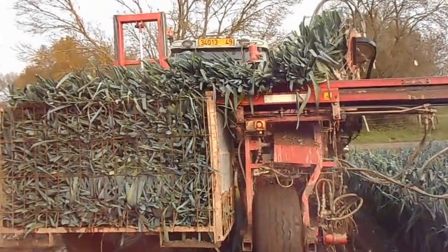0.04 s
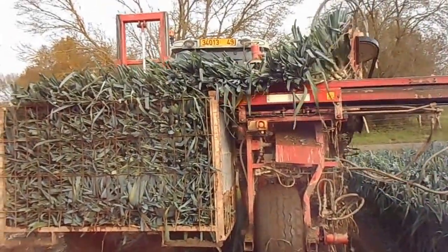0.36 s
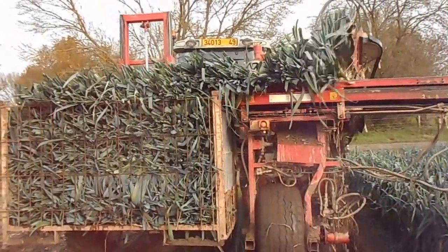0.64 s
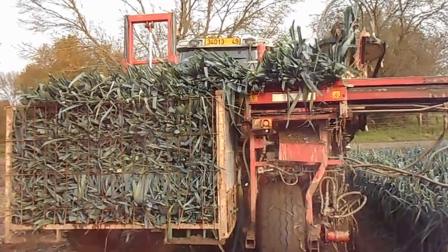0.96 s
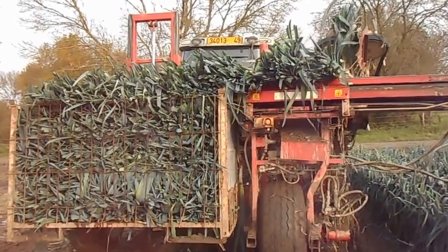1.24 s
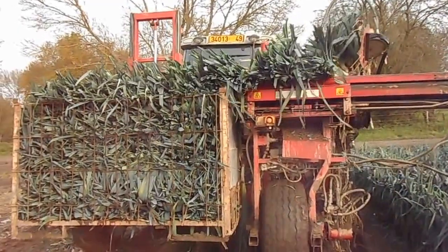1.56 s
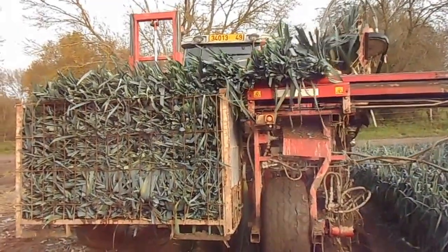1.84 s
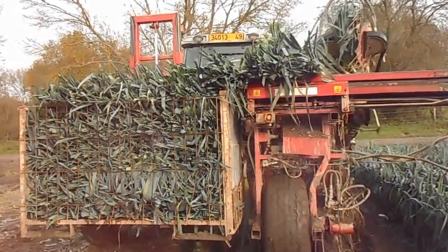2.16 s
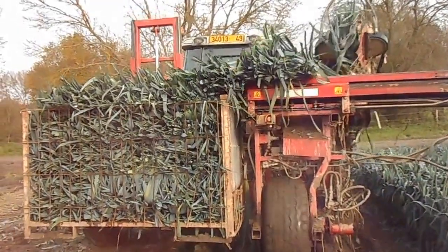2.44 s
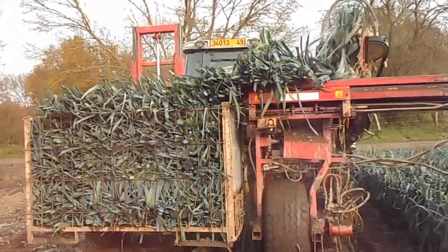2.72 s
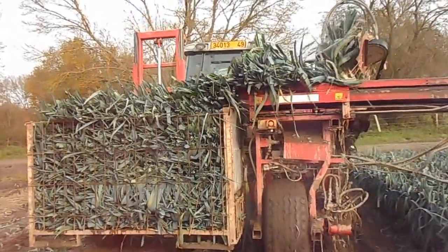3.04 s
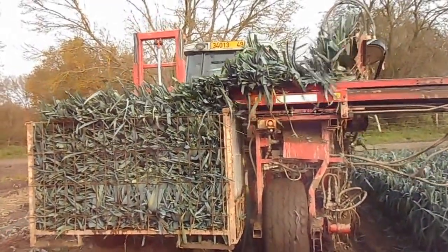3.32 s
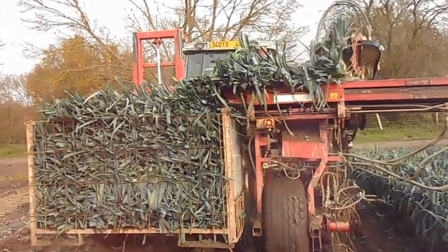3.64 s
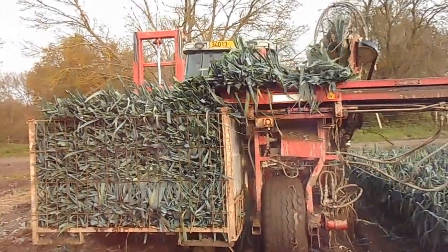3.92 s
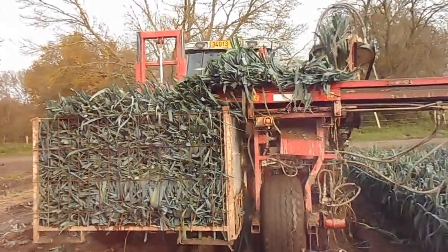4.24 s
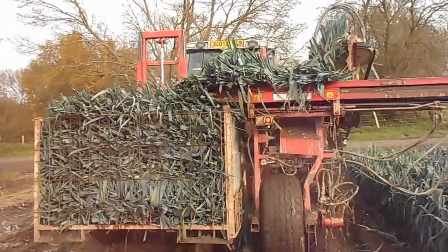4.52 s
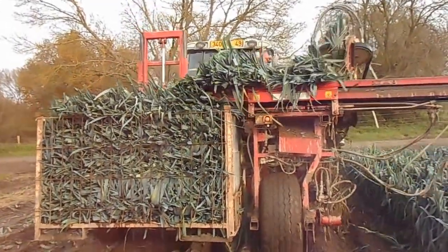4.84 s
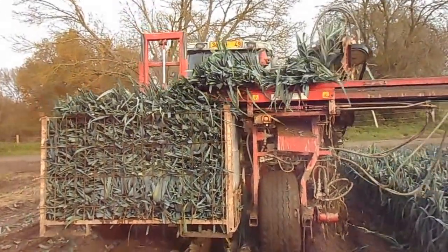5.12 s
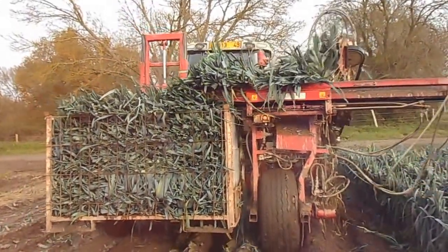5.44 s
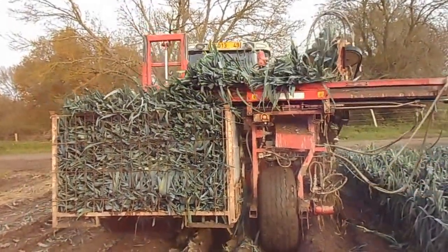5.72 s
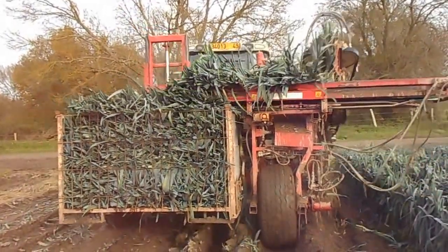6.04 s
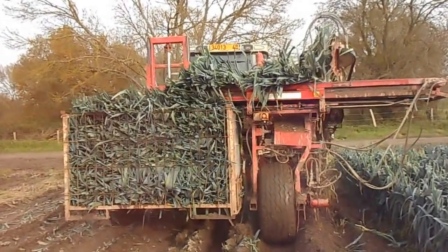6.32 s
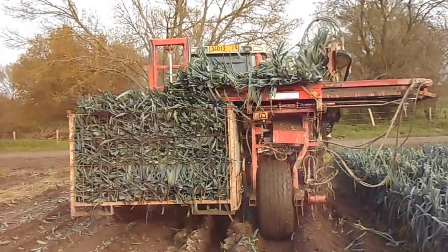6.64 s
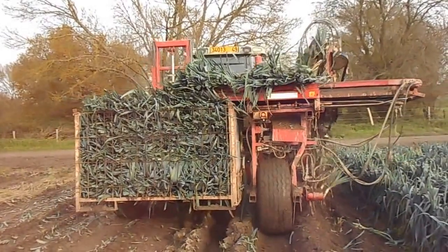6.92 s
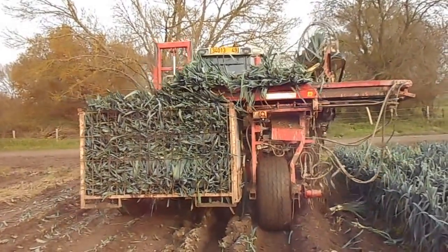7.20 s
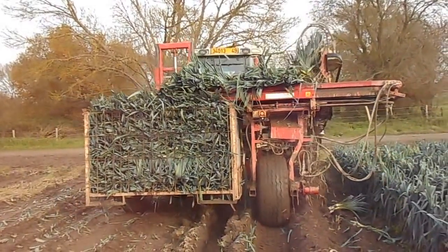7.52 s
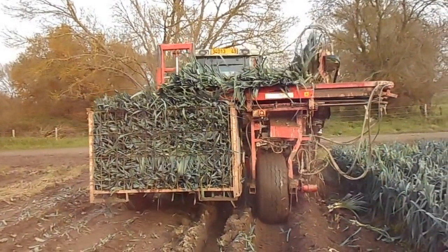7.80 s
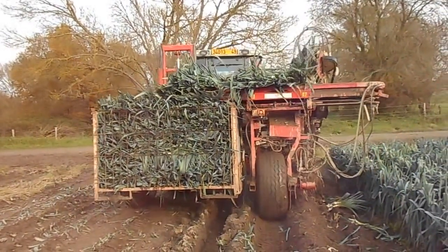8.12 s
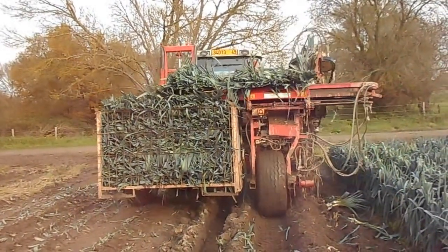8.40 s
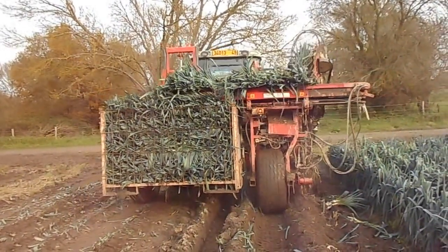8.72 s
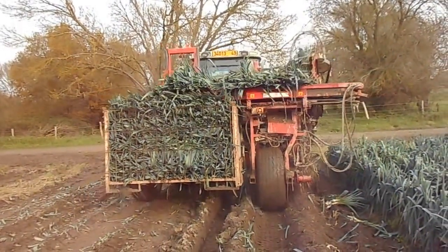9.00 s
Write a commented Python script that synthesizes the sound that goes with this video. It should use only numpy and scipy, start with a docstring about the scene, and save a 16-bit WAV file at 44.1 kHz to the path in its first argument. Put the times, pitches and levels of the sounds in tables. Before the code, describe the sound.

Steady gear whine and conveyor rattle of a tractor-pulled harvester, with crackling leaves, faint squeaks and one sharp metal clank.

```python
"""In a field, a few metres behind a tractor that slowly pulls a leek harvester.
The diesel hums under whining gears and a hydraulic pump, all turned by one crankshaft.
Conveyors clatter, leaves crackle, stalks snap and grit pings off the frame. A dry roller squeaks
in runs, once a turn, and a slipping belt squeals briefly. Once, steel scrapes and clanks
loudly, and the camera's gain control turns everything down for a moment."""
import sys
import numpy as np
from scipy import signal
from scipy.fft import rfft, irfft, next_fast_len
from scipy.io import wavfile
from scipy.ndimage import uniform_filter1d, minimum_filter1d, map_coordinates

SR = 44100
rng = np.random.default_rng(int(sys.argv[2]) if len(sys.argv) > 2 else 0)


def to_wav(s):
    """Save 16-bit WAV."""
    ch = np.atleast_2d(s).T  # columns
    pcm = np.round(np.clip(ch, -1, 1) * 32767)  # PCM
    wavfile.write(sys.argv[1], SR, pcm.astype(np.int16))


N = 403956
T = np.arange(N) / SR
CRANK_HZ = 36.9  # usual turns per second; the tone tables give their pitches at this speed

# engine speed, held nearly steady by the governor: time_s, turns_per_s
ENGINE_SPEED = [(0, 36.87), (1.1, 36.94), (2.4, 36.91), (3.6, 37.04), (4.4, 36.9), (5.25, 36.78),
                (6.3, 36.85), (7.7, 36.92), (8.4, 36.87), (8.8, 36.76), (9.16, 36.86)]
# hum of the four-cylinder diesel: cycles_per_turn, level_db
ENGINE_TONES = [(1, -58), (2, -59.5), (3, -69), (3.5, -61.5), (4, -67), (5.5, -72), (6, -71), (7, -70),
                (9, -63), (14, -57), (14.5, -56), (15, -55.5)]
# the firing note grows louder under load: time_s, boost_db
FIRING_BOOST = [(0, 2), (2, 3), (3.7, 0.5), (5.5, 2.5), (7.3, 6), (9.16, 3)]

# tones of each spinning part: pitch_hz, level_db
FAN_TONES = [(151.3, -68), (154.1, -60), (308.2, -57), (412, -58), (428.2, -57), (616.5, -48.5), (925, -49),
             (1233.5, -45)]
PUMP_TONES = [(605.2, -44), (2420.8, -52)]
LOW_GEAR_TONES = [(709, -45.5), (718.2, -53), (745.8, -53)]
MID_GEAR_TONES = [(1418, -36.5), (1454.8, -35), (1427.2, -50), (1464, -48)]
HIGH_GEAR_TONES = [(2163.8, -40), (2200.5, -42.5), (2237.5, -50), (2700.8, -47)]
DRIVE_TONES = [(1504.5, -43), (1541.5, -46), (1578.2, -41), (1615, -45), (1776, -50), (1812.8, -39),
               (1849.8, -46), (1886.5, -45.5)]
BEARING_TONES = [(2053.2, -47), (2090, -41), (2099.5, -49)]
IDLER_TONES = [(961.5, -53), (994.5, -52), (1031.5, -47), (1068.2, -50), (1109.8, -52), (1196.5, -50),
               (1210.2, -45), (1270.8, -39.5), (1307.5, -43.5), (1344.5, -44), (1381.2, -39), (1491.8, -44)]
SPROCKET_TONES = [(1676, -43), (1689.5, -49), (1763.2, -48), (2429.5, -51), (2540, -46), (2576.8, -51),
                  (2737.5, -52), (3738, -54), (3885, -54), (3936, -54)]
# each loaded part swells and fades slowly: time_s, boost_db
PUMP_SWELL = [(0, -10), (1.3, 4), (2.4, -1), (4.4, 5.5), (6.1, -0.5), (7.0, -7), (9.16, -9)]
LOW_GEAR_SWELL = [(0, 2), (.4, 6), (1.2, 1.5), (2.2, -5.5), (5.4, -10), (6.1, 0.5), (7.6, 4), (9.16, -2)]
MID_GEAR_SWELL = [(0, -4.5), (1.3, 1), (2.4, -2), (3.7, -3), (4.4, -0.5), (5.1, -6), (6.3, 2.5),
                  (9.16, 1.5)]
HIGH_GEAR_SWELL = [(0, 0), (.8, 4.5), (1.5, -3), (2.8, 1), (6.2, -2.5), (7.2, 6), (8.4, -2), (9.16, 2)]
DRIVE_SWELL = [(0, -2), (.9, 2), (1.9, 3.5), (3.3, -4), (5.1, .5), (6.3, -0.5), (8.1, 2), (9.16, 2)]
BEARING_SWELL = [(0, -9), (.8, -2), (1.4, -16), (2.8, 0), (4.5, 7.5), (5.6, -4), (7, -6), (9.16, 2)]

# how each noise spreads from bass to treble: frequency_hz, level_db
CLATTER_COLOUR = [(20, -28), (45, -26), (100, -22), (200, -21.5), (290, -17), (410, -7), (460, -9.5),
                  (560, -4.5), (800, -6.5), (1100, -4), (1450, -3), (2100, -1), (2400, -4.5), (2750, -5),
                  (3100, -10), (6000, -25.5)]
LEAF_COLOUR = [(1500, -34), (2800, -5), (4000, -8), (5300, -6.5), (7000, -11.5), (8500, -15),
               (10000, -29.5)]
SNAP_COLOUR = [(600, -8.5), (2000, -3.5), (4000, -4.5), (6000, -9), (8000, -14), (10000, -20.5)]
CRACK_COLOUR = [(500, -7), (1400, 3), (2400, 4), (3700, 8), (5000, 1.5), (7000, -11), (10000, -40)]
# load on the conveyors: time_s, boost_db
CONVEYOR_LOAD = [(0, 0), (1.6, 0.7), (2.6, 0), (4.6, 0.6), (5.8, -1.5), (6.45, -1), (7, .5), (8.3, -0.8),
                 (9.16, -1)]
# flow of leeks up the belts: time_s, boost_db
LEAF_FLOW = [(0, 2.3), (1, 0.6), (2.35, 0.8), (2.55, 3), (3.2, 2.5), (3.9, 0.8), (7, 0), (9.16, -1.1)]
# brief dips in the whole drone: middle_s, change_db
DRONE_DIPS = [(.435, -4), (.635, -2.5), (2.35, -2), (2.89, -3), (3.6, -3.5), (4.19, -5), (4.79, -2.5),
              (5.615, -1.5), (5.74, -3), (6.265, -2.5), (8.98, -1.5)]

# stalks snapping on the belts: start_s, level_db
STALK_SNAPS = [(0.3986, -14.5), (2.489, -17), (2.672, -13.5), (2.7576, -15.5), (2.8596, -17), (3.237, -22),
               (4.0825, -17), (4.149, -18), (4.846, -14.5), (4.9, -18), (4.9726, -17), (5.4076, -24),
               (5.453, -16.5), (5.684, -18), (6.345, -20)]
# grit hitting the frame: start_s, level_db
GRIT_HITS = [(2.9865, -17.5), (4.7315, -16), (8.1045, -25), (8.9565, -19.5)]
# ringing notes of the struck frame: pitch_hz, level_db, fade_s (time to fall 60 dB)
FRAME_NOTES = [(3300, -2, .016), (3700, -1, 0.016), (4120, -2, .022), (4380, -2, 0.025),
               (5130, -3.5, 0.032), (6200, -11, .027), (7290, -11.5, 0.042)]
# runs of roller squeaks: first_s, last_s, first_db, last_db, pitch_hz
SQUEAK_RUNS = [(0.411, 1.184, -42, -39, 7800), (3.108, 3.309, -39, -41, 7800),
               (3.921, 4.335, -35.5, -36, 7770), (4.551, 4.978, -36.5, -34.5, 7900),
               (5.192, 5.794, -38, -35.5, 7960), (6.191, 7.579, -35, -42.5, 7920),
               (7.966, 9.161, -40.5, -39, 7670)]
# squeal of the slipping belt: time_s, pitch_hz, level_db
BELT_SQUEAL = [(8.02, 1630, -60), (8.07, 1655, -27), (8.13, 1666, -52), (8.18, 1700, -27),
               (8.24, 1667, -34), (8.29, 1678, -24), (8.35, 1670, -63)]
# blows as the steel catches: start_s, level_db, thud_share_db (relative to the blow)
STEEL_BLOWS = [(3.626, -3.5, -26), (3.638, -7, -15), (3.648, -8, -6), (3.662, -3, -11), (3.676, -6, -18),
               (3.692, -8, -20)]
# ringing notes of that steel: pitch_hz, width_hz, level_db
STEEL_NOTES = [(1440, 80, -9), (2765, 22, 3), (3110, 90, -1), (3530, 110, 0), (3880, 220, 1),
               (4260, 100, 0), (4560, 150, -5), (5990, 200, -11)]


def undb(db):
    """Turn decibels into a gain to multiply by."""
    return np.exp(np.asarray(db) * (np.log(10) / 20))


def unit(x):
    """Scale a signal to an average power of 1."""
    return x / np.sqrt(np.mean(x ** 2))


def curves(rows):
    """Join the rows of a timed table with straight lines: one curve per value column."""
    times, *columns = np.transpose(rows)
    return [np.interp(T, times, column) for column in columns]


def noise():
    """White noise: an even hiss."""
    return rng.standard_normal(N)


def wander(rate_hz):
    """A smooth random curve, roughly 1 either side of zero, changing about rate_hz times a second."""
    steps = rng.standard_normal(2 ** 14)
    return map_coordinates(steps, [T[::16] * rate_hz + 3], order=3, mode="wrap").repeat(16)[:N]


def colour(x, points):
    """Shape bass and treble by a colour table; white noise keeps its power."""
    hz, db = np.transpose(points)
    size = next_fast_len(N)
    freqs = np.maximum(np.arange(size // 2 + 1) * SR / size, 1)
    gain = undb(np.interp(np.log(freqs), np.log(hz), db))
    edge_fade = np.minimum(freqs / hz[0], 1) ** 2 * np.minimum(hz[-1] / freqs, 1) ** 2
    return irfft(rfft(x, size) * unit(gain * edge_fade), size)[:N]


def resonate(x, hz, width_hz):
    """Let a sound ring around one pitch; a narrower width rings longer."""
    return signal.lfilter(*signal.iirpeak(hz, hz / width_hz, fs=SR), x)


def blow(start_s, rise_s, fade_s):
    """Loudness of a blow: a quick rise, then a fall of 60 dB every fade_s."""
    age = np.clip(T - start_s, 0, 2)
    return (1 - np.exp(-age / rise_s)) * undb(-np.minimum(60 * age / fade_s, 200))


def add(out, start_s, sound):
    """Mix a short sound into out."""
    start = max(int(start_s * SR), 0)
    part = sound[:max(N - start, 0)]
    out[start:start + len(part)] += part


def diesel(turns):
    """The muffled exhaust hums in step with the crank; the firing note, two a turn, follows the load."""
    load_db = curves(FIRING_BOOST)[0]
    return sum(undb(db + load_db * (per_turn == 2)) * np.sin(2 * np.pi * (per_turn * turns + rng.random()))
               for per_turn, db in ENGINE_TONES)


def whine(turns, tones, wander_db):
    """Tones geared to the crank: each drifts a little, and all flutter with uneven load on the teeth."""
    out = 0
    for hz, db in tones:
        slip = .35 * wander(4)
        phase = 2 * np.pi * (hz / CRANK_HZ * turns + rng.random()) + slip
        out = out + undb(db + wander_db * wander(2.5)) * np.sin(phase)
    return out * (1 + .18 * wander(20))


def transmission(turns, loaded_db=0.43, free_db=-0.4):
    """Pump, gears and bearing follow their load; fan, idler gears and sprockets wander freely."""
    # shaft wobble gives tones one crank rate apart, which beat once a turn
    parts = [(PUMP_TONES, PUMP_SWELL), (LOW_GEAR_TONES, LOW_GEAR_SWELL),
             (MID_GEAR_TONES, MID_GEAR_SWELL), (HIGH_GEAR_TONES, HIGH_GEAR_SWELL),
             (DRIVE_TONES, DRIVE_SWELL), (BEARING_TONES, BEARING_SWELL)]
    loaded = sum(undb(curves(swell)[0]) * whine(turns, tones, wander_db=1.1) for tones, swell in parts)
    free = whine(turns, FAN_TONES, wander_db=1.2)
    free += whine(turns, IDLER_TONES, wander_db=2.6)
    free += whine(turns, SPROCKET_TONES, wander_db=2.6)
    return np.sqrt(2) * (undb(loaded_db) * loaded + undb(free_db) * free)


def chatter(turns, blend_turns=7):
    """The same teeth and links strike on every shaft turn; the pattern changes over a few turns."""
    turn_samples = int(SR / CRANK_HZ)
    pattern = rng.standard_normal((int(turns[-1]) + 2, turn_samples))  # one row per turn
    for _ in range(2):
        pattern = uniform_filter1d(pattern, blend_turns, axis=0)
    return unit(map_coordinates(pattern.ravel(), [turns * turn_samples], order=3))


def conveyors(turns, grain_db=2, throb_db=0.5, flicker_db=1.7, clatter_db=-26.5, split_hz=900):
    """Countless links and rollers hit the steel frame, partly repeating with two shafts."""
    slow_turns = turns * 5 / 6
    strikes = noise() + .75 * chatter(turns) + .5 * chatter(slow_turns)
    knock = 1 + 0.09 * np.sin(2 * np.pi * slow_turns)
    body = colour(strikes * undb(grain_db * wander(900)) * knock, CLATTER_COLOUR)
    # the big panels (low) and the small links (high) rattle independently
    panels = signal.sosfilt(signal.butter(1, split_hz, fs=SR, output="sos"), body)
    links = body - panels
    rattle = panels * undb(flicker_db * wander(25)) + links * undb(flicker_db * wander(30))
    load_db = curves(CONVEYOR_LOAD)[0]
    return unit(rattle) * undb(load_db + clatter_db + throb_db * wander(12))


def leaves(grain_db=2.0, flicker_db=1.94, rustle_db=-36):
    """Leek leaves drag along the belts: dense tiny crackles of very unequal size."""
    hiss = noise()
    sizes = np.minimum(rng.exponential(size=N // 16 + 1), 6)
    crackles = hiss * undb(grain_db * sizes).repeat(16)[:N]
    flow_db = curves(LEAF_FLOW)[0]
    return unit(colour(crackles, LEAF_COLOUR)) * undb(flow_db + rustle_db + flicker_db * wander(45))


def drone_dips(width_s=.028):
    """A gain that makes the drone sink briefly and come back."""
    return undb(sum(db * np.exp(-((T - middle_s) / width_s) ** 2) for middle_s, db in DRONE_DIPS))


def stalk_snaps(fade_s=0.044, snap_db=-4):
    """Stalks crack above the rustle, each a quick run of breaking fibres."""
    out, age = np.zeros(N), T[:SR // 8]
    fibres = unit(noise() * undb(3.5 * wander(1300)))
    for start_s, db in STALK_SNAPS:
        burst = fibres[int(start_s * SR):][:len(age)]
        add(out, start_s, undb(db + snap_db - 60 * age / fade_s) * burst)
    return colour(out, SNAP_COLOUR)


def grit_pings(detune=.02):
    """Small stones strike the muddy steel: a short clink, a little different at each spot."""
    out, age = np.zeros(N), T[:SR // 8]
    for start_s, hit_db in GRIT_HITS:
        for hz, note_db, fade_s in FRAME_NOTES:
            pitch = hz * (1 + detune * rng.standard_normal())
            ring = np.sin(2 * np.pi * (pitch * age + rng.random()))
            add(out, start_s, undb(hit_db + note_db - 60 * age / fade_s) * ring)
    return out


def dry_roller(turns_per_s=5, typical_s=0.048, arch=.04, squeak_db=3, rasp_hz=210, scatter_hz=90):
    """A dry bearing sticks and slips once a turn: a short, raspy chirp that rises and falls."""
    out = np.zeros(N)
    for first_s, last_s, first_db, last_db, hz in SQUEAK_RUNS:
        count = round((last_s - first_s) * turns_per_s) + 1
        for time_s, db in np.linspace((first_s, first_db), (last_s, last_db), count):
            higher, longer = rng.standard_normal(2)
            length_s = typical_s * np.exp(0.22 * longer)
            position = np.linspace(-1, 1, int(length_s * SR))  # 0 is the middle of the chirp
            swell = np.sin(np.pi * ((position + 1) / 2) ** 0.83) ** 2
            rasp = unit(uniform_filter1d(rng.standard_normal(16384), 24))[:len(position)]
            pitch = (hz + scatter_hz * higher) * (1 - arch * position ** 2) + rasp_hz * rasp
            chirp = swell * np.sqrt(2) * np.sin(2 * np.pi * np.cumsum(pitch) / SR)
            add(out, time_s - .45 * length_s, undb(db + squeak_db) * chirp)
    return out


def slipping_belt(waver_hz=9):
    """A slipping belt sings with a slightly unsteady pitch."""
    hz, db = curves(BELT_SQUEAL)
    sounding = (T > BELT_SQUEAL[0][0]) & (T < BELT_SQUEAL[-1][0])
    pitch = hz + waver_hz * wander(83)
    return sounding * undb(db) * np.sqrt(2) * np.sin(2 * np.pi * np.cumsum(pitch) / SR)


def steel_scrape(start_s=3.5, hz=3750, width_hz=900, scrape_db=-26):
    """Steel drags on steel, harder and harder, until it catches."""
    catch_s, stop_s = STEEL_BLOWS[0][0], STEEL_BLOWS[1][0]
    pressure = np.sqrt(np.clip((T - start_s) / (catch_s - start_s), 0, 1)) * (T < stop_s)
    slips = noise() * undb(2 * wander(400))
    screech = resonate(resonate(slips, hz, width_hz), hz, 2 * width_hz)
    return undb(scrape_db) * pressure * unit(screech)


def steel_clank(ring_db=-5, crack_db=-6, thud_db=-8, thud_hz=520, thud_width_hz=260):
    """Steel catches and chatters: each blow cracks, rings the same notes and makes the frame thud."""
    blows = [undb(db) * blow(start_s, rise_s=.001, fade_s=0.13) for start_s, db, _ in STEEL_BLOWS]
    force = np.sqrt(sum(hit ** 2 for hit in blows))
    contact = noise() * force
    ring = sum(undb(db) * resonate(contact, hz, width_hz) for hz, width_hz, db in STEEL_NOTES)
    push = noise() * sum(hit * undb(share_db) for hit, (_, _, share_db) in zip(blows, STEEL_BLOWS))
    thud = resonate(resonate(push, thud_hz, thud_width_hz), thud_hz, 2 * thud_width_hz)
    # make up for the power that the narrow filters take away
    ring *= np.sqrt(SR / np.pi / sum(width_hz for _, width_hz, _ in STEEL_NOTES))
    thud *= np.sqrt(SR / np.pi / thud_width_hz)
    crack = colour(noise() * force, CRACK_COLOUR)
    return undb(ring_db) * ring + undb(crack_db) * crack + undb(thud_db) * thud


def scene():
    """The whole machine in the open air: a drone driven by one crankshaft, with short sounds on top."""
    turns = np.cumsum(curves(ENGINE_SPEED)[0]) / SR  # crankshaft turns so far
    drone = diesel(turns) + transmission(turns) + conveyors(turns) + leaves()
    events = stalk_snaps() + grit_pings() + dry_roller() + slipping_belt()
    return (drone * drone_dips() + events + steel_scrape() + steel_clank())[None]


def gain_control(x, threshold_db=-18, max_cut_db=10, hold_s=0.054, slide_s=0.082):
    """Loud sound pulls the gain down; it holds, then slides back."""
    power = signal.lfilter(*signal.butter(1, 25, fs=SR), x ** 2)
    excess_db = np.maximum(10 * np.log10(np.abs(power) + 1e-12) - threshold_db, 0)
    wanted_db = -np.minimum(2 * excess_db, max_cut_db)
    hold, slide = int(hold_s * SR), int(slide_s * SR)
    held_db = minimum_filter1d(wanted_db, hold, origin=(hold - 1) // 2)
    return x * undb(uniform_filter1d(held_db, slide, origin=(slide - 1) // 2))


def record(dry):
    """The camera turns loud moments down, rounds the peaks and cuts the highest treble."""
    ceiling, top_hz = .72, 10100
    rounded = ceiling * np.tanh(gain_control(dry[0]) / ceiling)
    return signal.sosfilt(signal.ellip(16, .2, 80, top_hz, fs=SR, output="sos"), rounded)[None]


dry = scene()
out = record(dry)
to_wav(out)
```